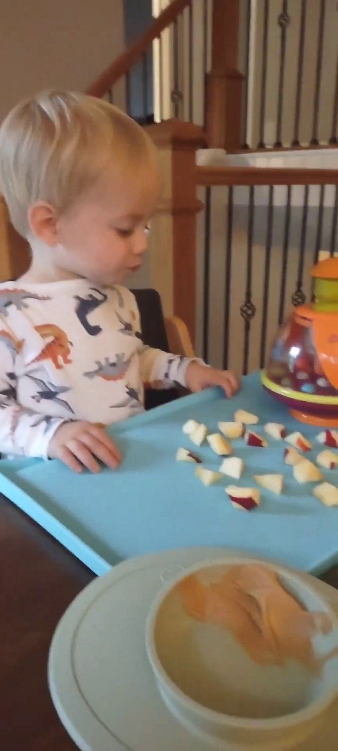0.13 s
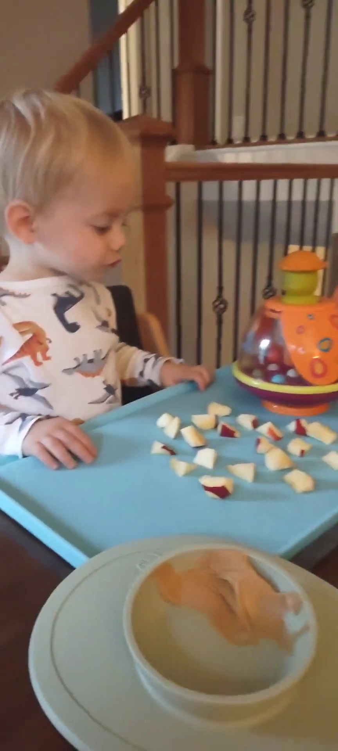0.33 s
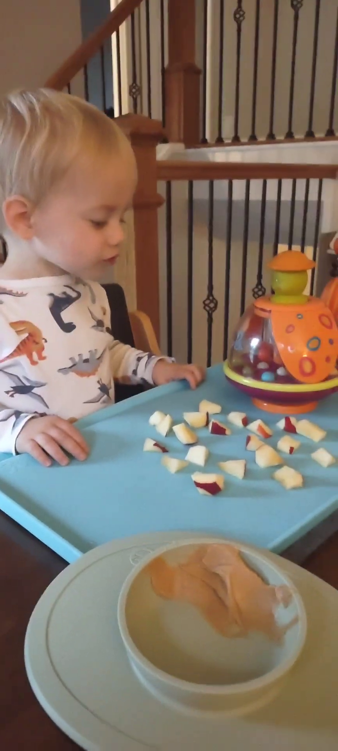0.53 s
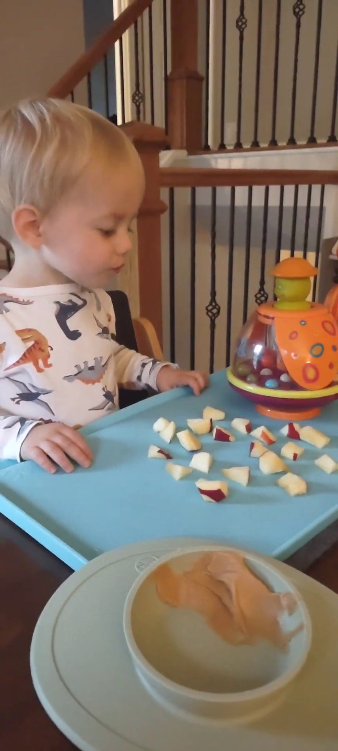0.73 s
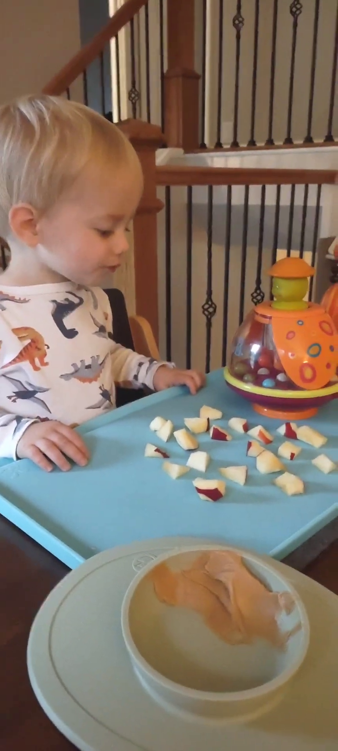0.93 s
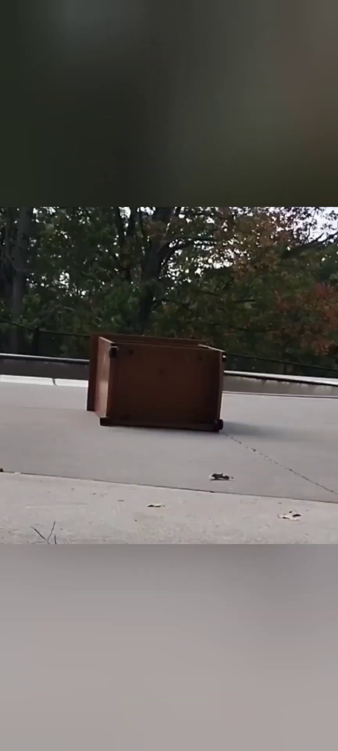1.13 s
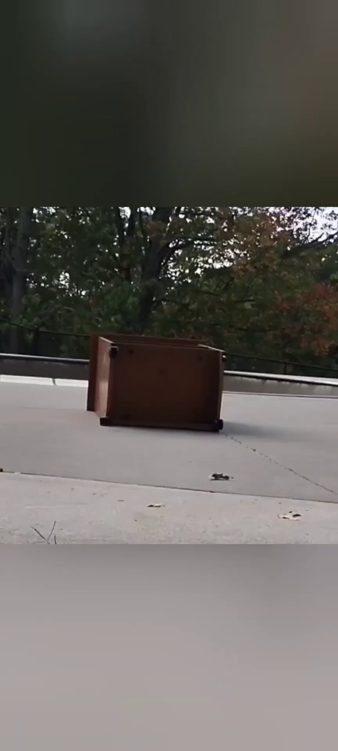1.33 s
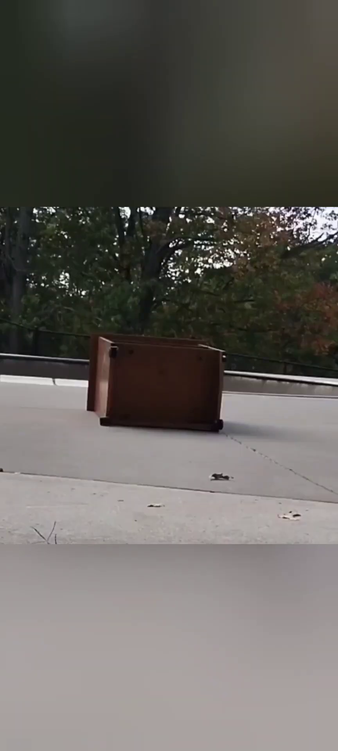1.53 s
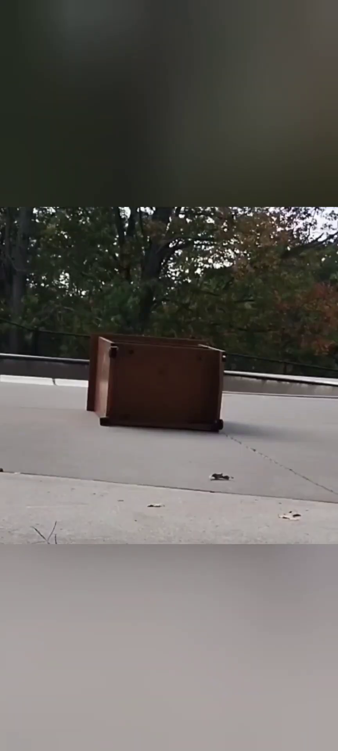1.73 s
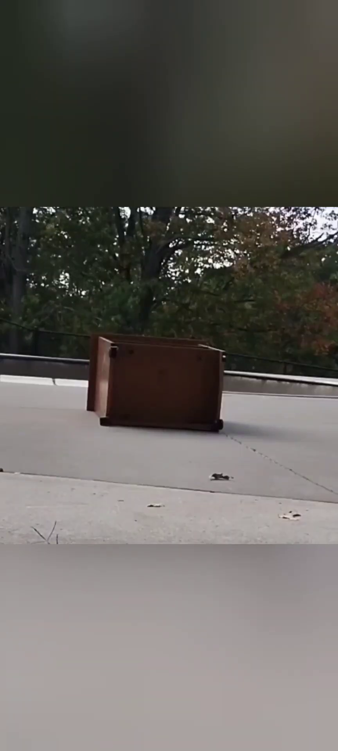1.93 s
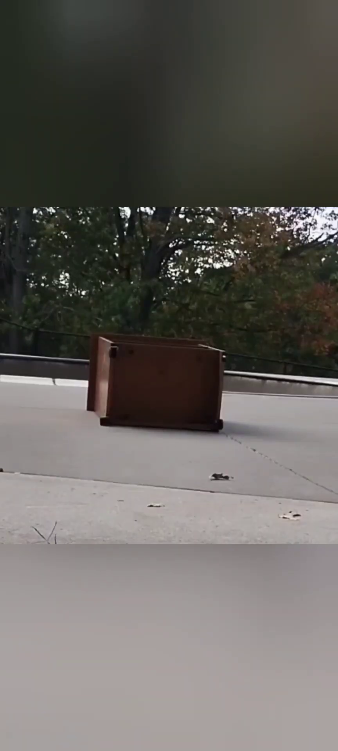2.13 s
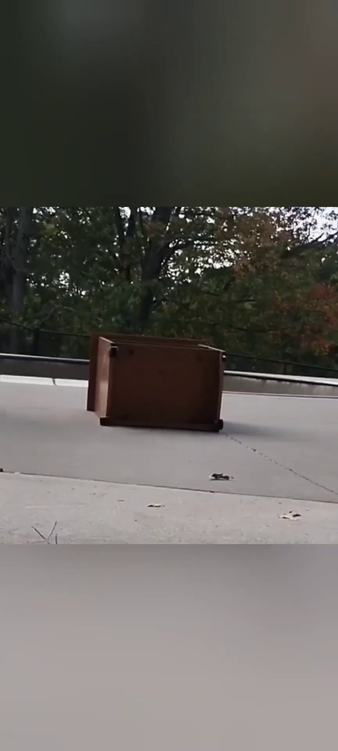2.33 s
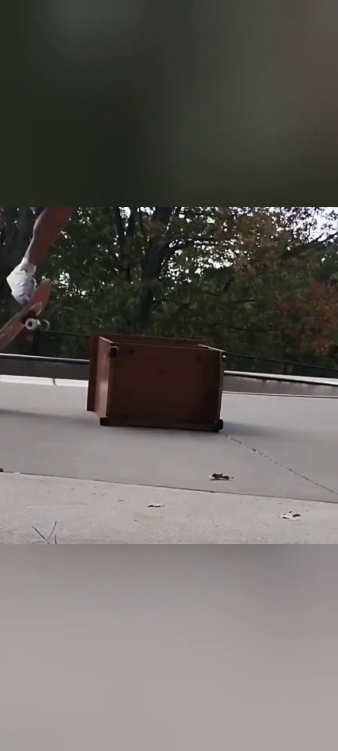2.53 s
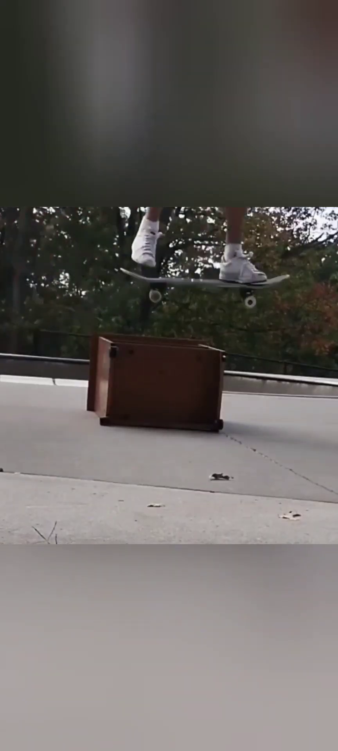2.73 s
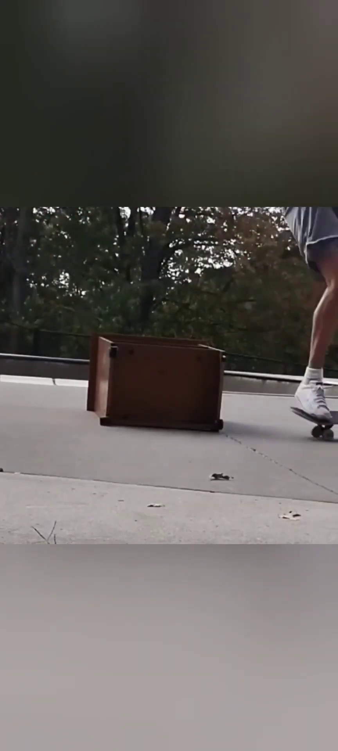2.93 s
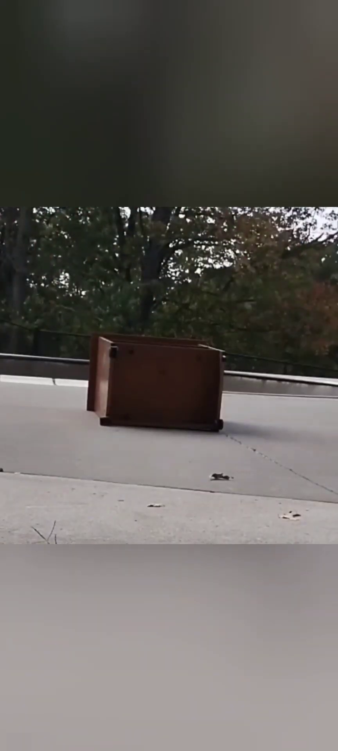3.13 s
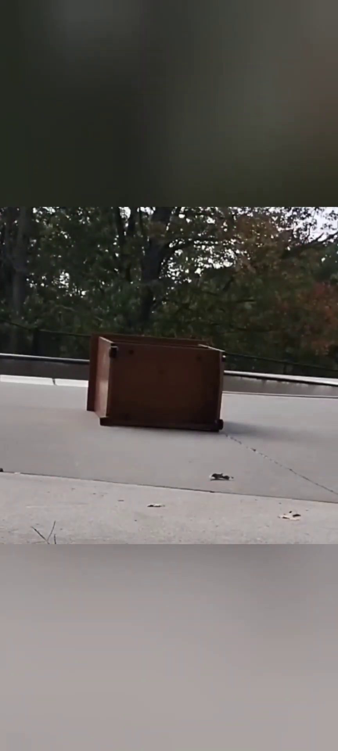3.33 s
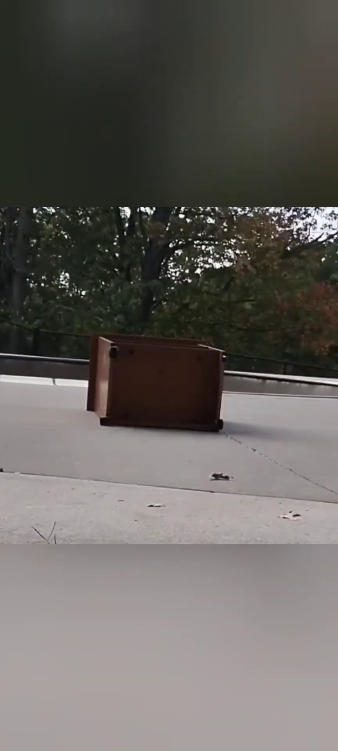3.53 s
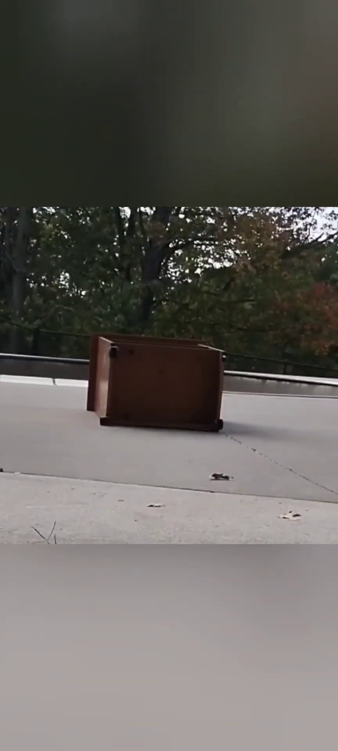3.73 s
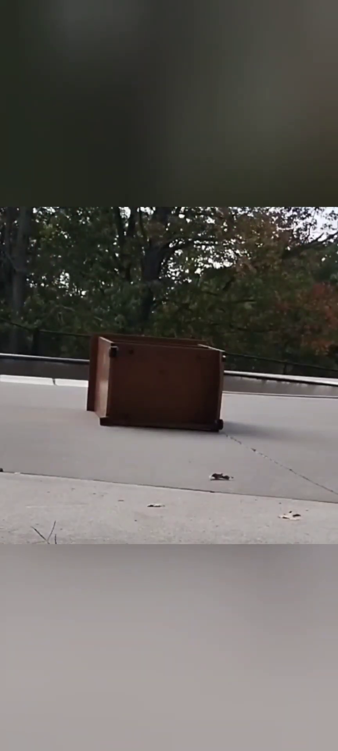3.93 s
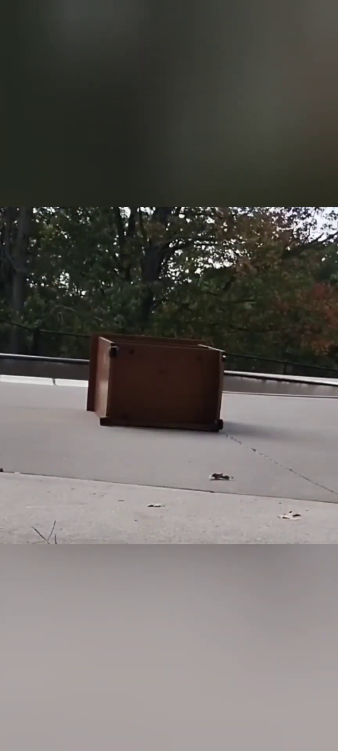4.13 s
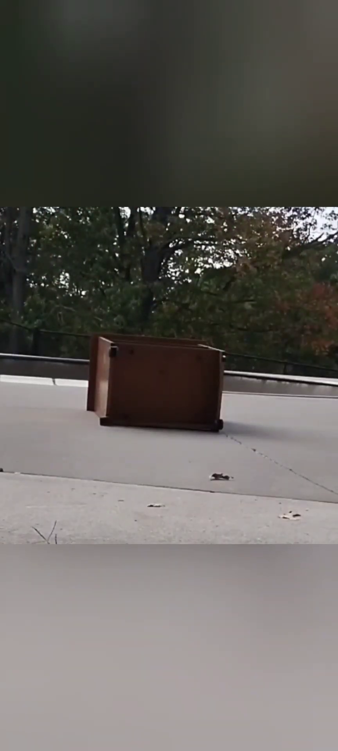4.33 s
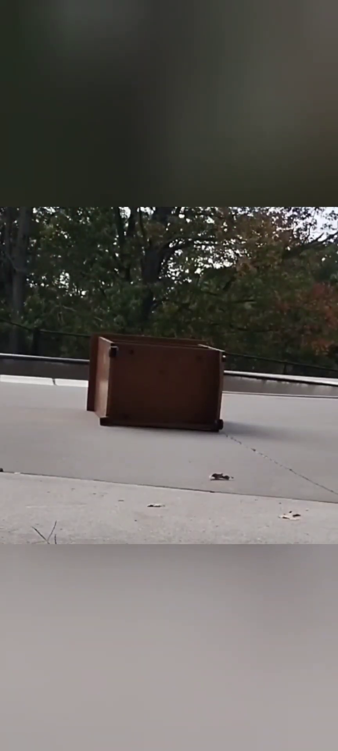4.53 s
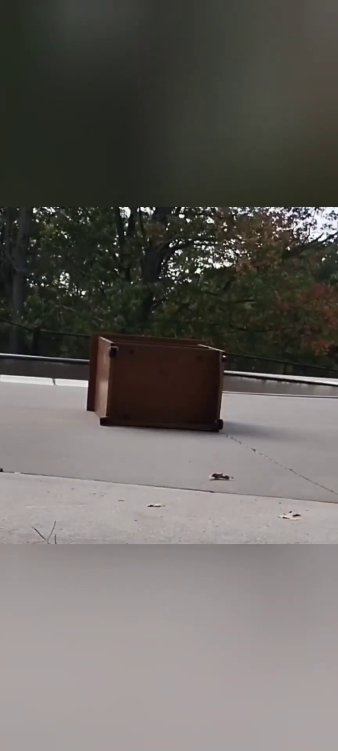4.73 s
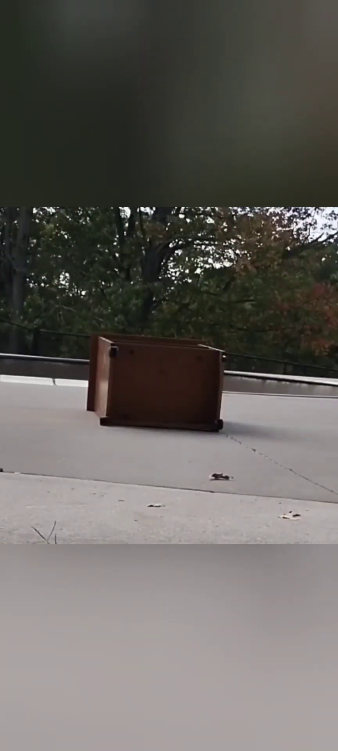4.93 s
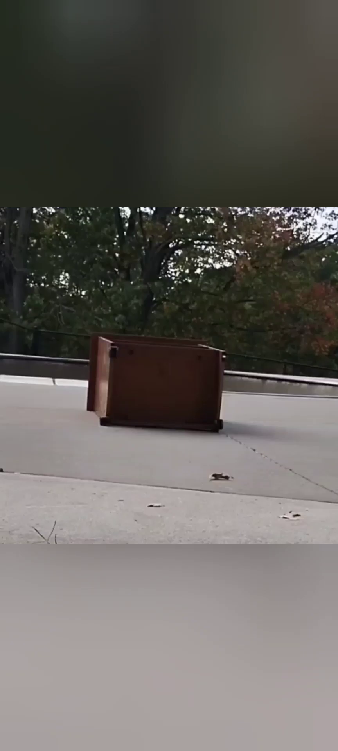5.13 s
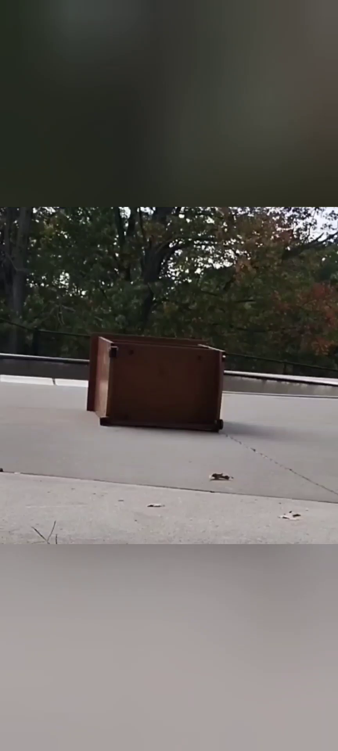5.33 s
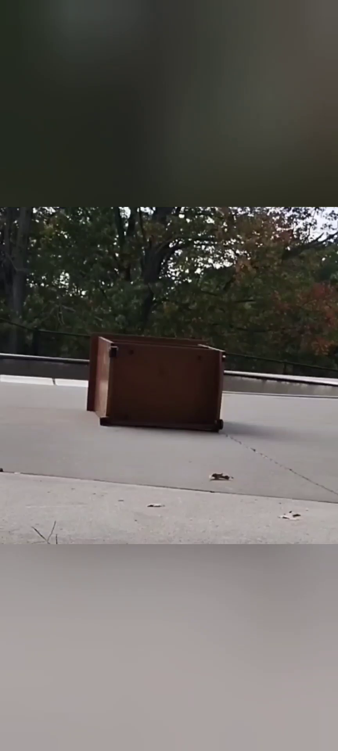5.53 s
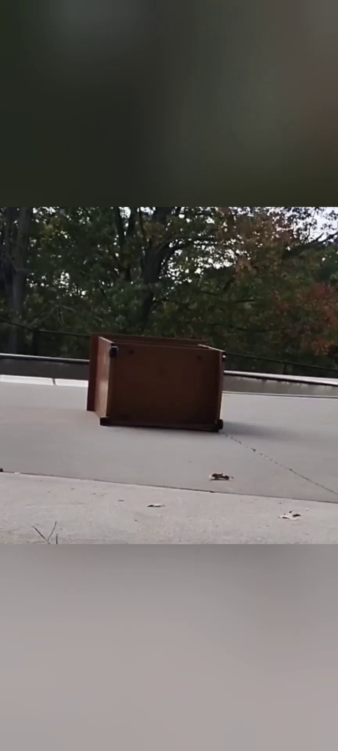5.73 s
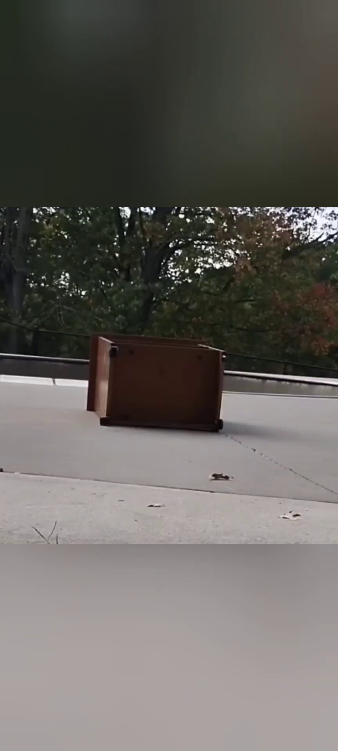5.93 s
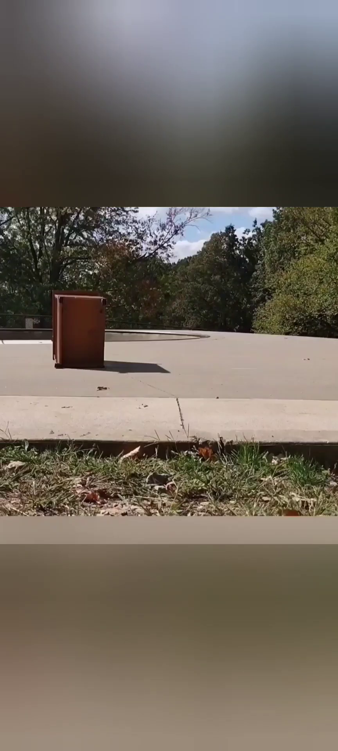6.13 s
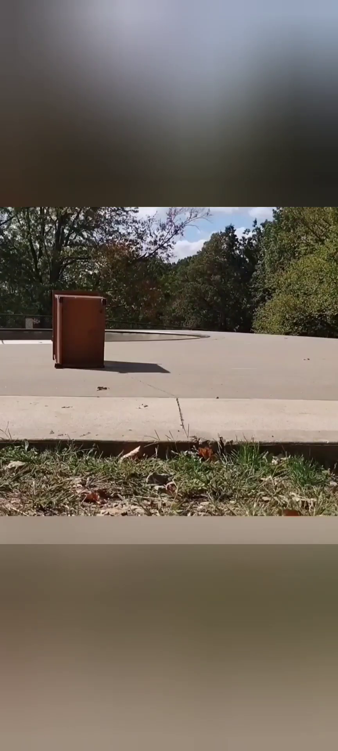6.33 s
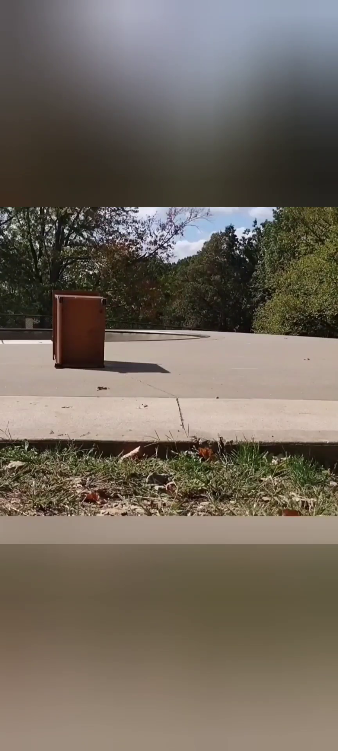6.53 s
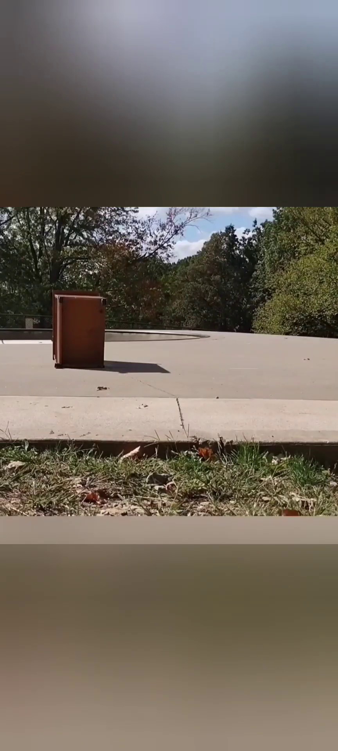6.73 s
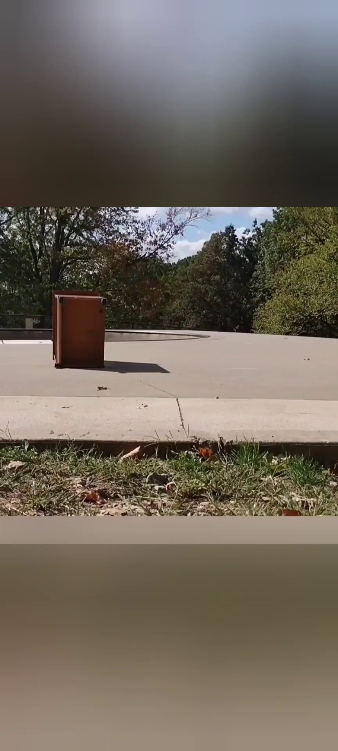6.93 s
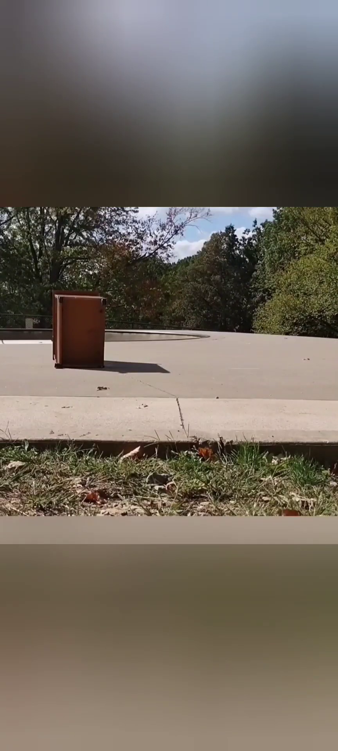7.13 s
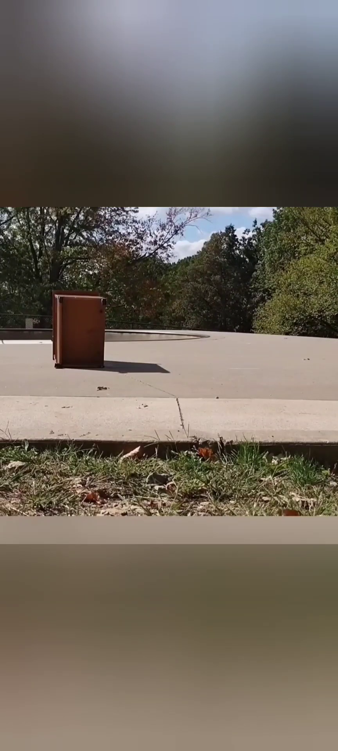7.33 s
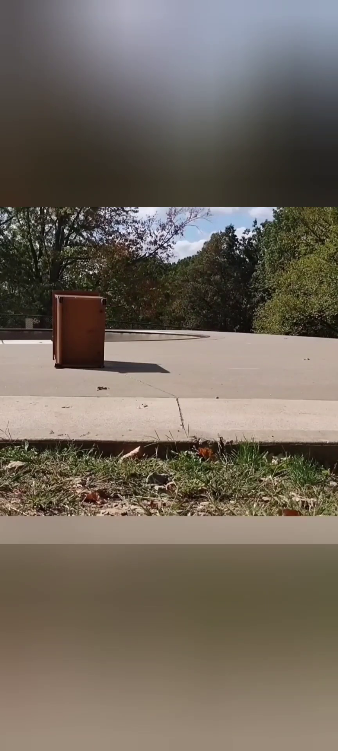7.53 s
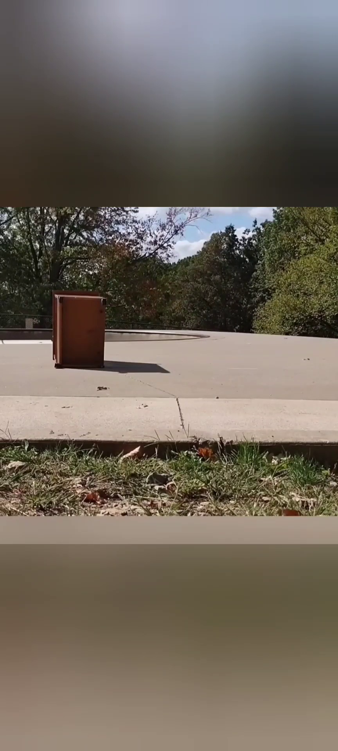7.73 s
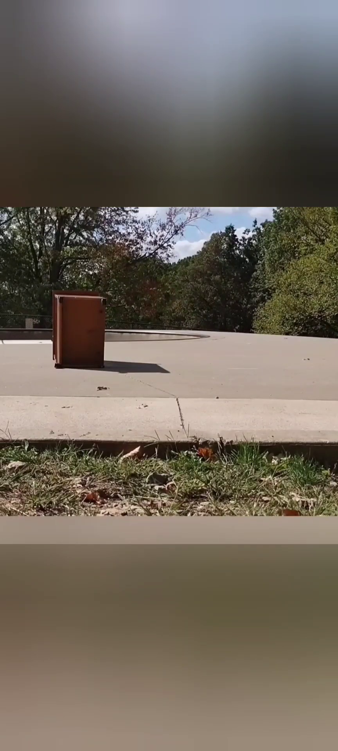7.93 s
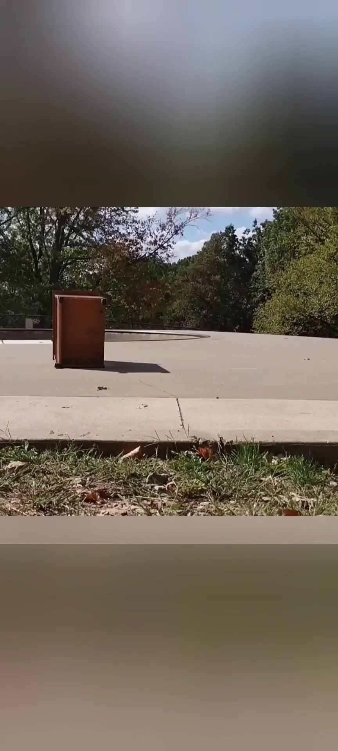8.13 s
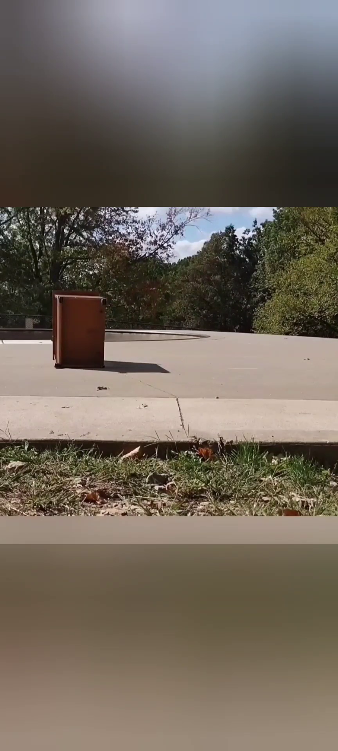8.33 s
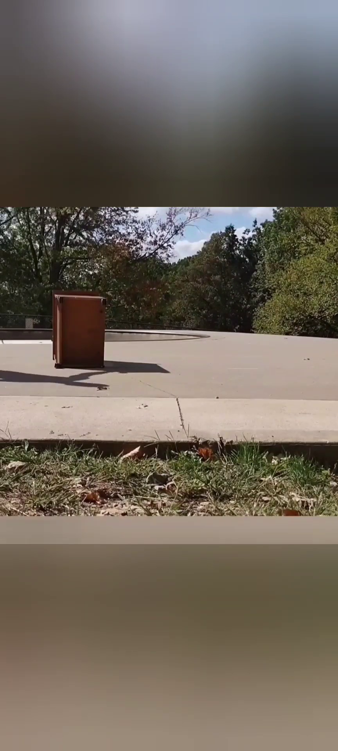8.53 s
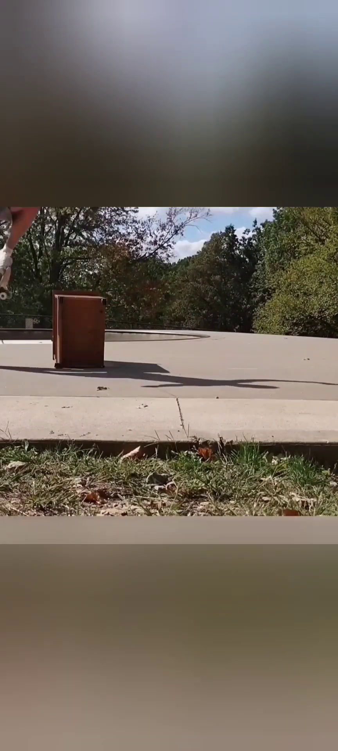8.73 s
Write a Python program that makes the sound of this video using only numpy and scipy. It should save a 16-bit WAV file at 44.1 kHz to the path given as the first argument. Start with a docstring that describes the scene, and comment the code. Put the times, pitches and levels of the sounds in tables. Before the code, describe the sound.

A very faint kitchen sizzle with tiny spits and a soft hum lasts about a second. It cuts to outdoor concrete: hard skateboard wheels roar closer, clacking over joints, the tail pops loudly, the board is briefly airborne, slams down and rolls away. After another cut a second run builds slowly to a duller pop at the end. A fixed microphone near the ground hears nearly everything on the right.

```python
"""Something sizzles faintly in a kitchen for a second; then a skateboard makes two runs on outdoor concrete.
Sizzle and rolling are trains of random impacts through colouring filters; ringing parts are resonances.
Hard wheels roar on the slab and clack over its joints; each run has a tail pop, and the first board slams down.
Each blow excites the deck's decaying modes. Trees answer with diffuse noise and a low drone wavers far off.
Nearly everything is in the right channel. Source levels are stated before a common doubling (+6 dB)."""
import sys
import numpy as np
from scipy import signal
from scipy.fft import rfft, irfft, next_fast_len
from scipy.io import wavfile
from scipy.ndimage import uniform_filter1d, map_coordinates

SR = 44100
rng = np.random.default_rng(int(sys.argv[2]) if len(sys.argv) > 2 else 0)


def master_out(mix):
    """Clip the mix to full scale and print it as 16-bit PCM to the path in sys.argv[1]."""
    frames = np.transpose(np.atleast_2d(mix))
    ceiling = np.clip(frames, -1, 1)
    pcm = np.round(ceiling * 32767).astype(np.int16)
    wavfile.write(sys.argv[1], SR, pcm)


N = 392049

# limits of the three stretches: (kitchen end [s], first run start [s], first run end [s], second run start [s])
STRETCHES = (1.139, 1.19, 6.135, 6.145)
# tail pop, landing and second tail pop: (time [s], peak level [dB], clack re knock [dB], crack re knock [dB],
# tail weight [0-1], contact time [s], low-pass corner [Hz], echo level [dB], echo treble boost [dB])
SLAMS = [(2.615, -7.5, -1.5, -23.5, 0.89, 0.0049, 8000, -35.5, 3.5),
         (3.03, -6.5, -2.5, -25.5, 0.02, 0.0077, 14040, -45.5, 12),
         (8.7795, -11.5, -6, -20, 0.92, 0.0046, 4500, -40.5, 8)]


def amp(db):
    """Level to amplitude ratio: 20 dB is a factor of ten."""
    return 10 ** (np.asarray(db) / 20)


def unit(x):
    """Normalization to an rms of 1."""
    return x / np.sqrt(np.mean(x ** 2) + 1e-20)


def steady(x, size):
    """Short-term normalization: x held at rms 1 over every size samples."""
    return x / np.sqrt(np.abs(uniform_filter1d(x ** 2, size=size)) + 1e-12)


def along(points, hz):
    """Linear interpolation of (frequency [Hz], value) points on a log-frequency axis."""
    f, v = np.transpose(points)
    return np.interp(np.log(hz + 1), np.log(f + 1), v)


def hump(hz, centre, octaves):
    """A Gaussian bell of height 1 on the log-frequency axis."""
    return np.exp(-.5 * (np.log2((hz + 1) / centre) / octaves) ** 2)


def curves(rows):
    """Linear interpolation in time: one value per sample for each column after the time."""
    s, *cols = np.transpose(rows)
    return [np.interp(np.arange(N) / SR, s, c) for c in cols]


def wobble(rate, size):
    """A smooth random curve: a spline through rate normal deviates a second."""
    knots = rng.standard_normal(int(size * rate / SR) + 4)
    return map_coordinates(knots, [np.arange(size) * rate / SR])


def between(start, end):
    """A gate: 1 from start to end [s], 0 outside, with edges smoothed over 128 samples."""
    t = np.arange(N) / SR
    return uniform_filter1d(((t >= start) & (t < end)) * 1., size=128)


def add(track, s, sound):
    """Superposition: mix a sound in at s seconds."""
    part = track[round(s * SR):][:len(sound)]
    part += sound[:len(part)]


def filtered(x, response):
    """Linear filtering: the spectrum of x times a response of frequency."""
    n = x.shape[-1]
    m = next_fast_len(n + 8192)
    return irfft(rfft(x, m) * response(np.fft.rfftfreq(m, 1 / SR)), m)[..., :n]


def coloured(x, spectrum):
    """Spectral shaping by (frequency [Hz], gain [dB]) points, at rms 1."""
    return unit(filtered(x, lambda hz: amp(along(spectrum, hz))))


def swept(x, gain_db):
    """Time-varying filtering: each short-time spectrum times gain_db(Hz, s)."""
    hz, t, z = signal.stft(x, SR, nperseg=1024)
    return signal.istft(z * amp(gain_db(hz[:, None], t)), SR, nperseg=1024)[1][:len(x)]


def resonant(modes):
    """Noise through parallel resonators, each two equal band-passes in cascade, at rms 1."""
    def response(f):
        return sum(amp(db) * (1j * f * w / (c * c - f * f + 1j * f * w)) ** 2 for c, w, db in modes)
    return unit(filtered(rng.standard_normal(N), response))


def grains(rate, spread_db, size):
    """Shot noise: tiny impacts at random moments, rate a second, with log-normal sizes, at rms 1."""
    struck = rng.random(size) < rate / SR
    sign = np.sign(rng.standard_normal(size))
    return unit(struck * sign * amp(spread_db * rng.standard_normal(size)))


def kitchen():
    """Shot noise modulated into clumps, with decaying spits, a resonant appliance hum and two soft knocks."""
    # sizzle: (time [s], level [dB])
    sizzle_level = [(0, -53.5), (0.17, -57.5), (0.37, -54.5), (0.58, -60.5), (0.68, -56.5), (0.8, -64.5),
                    (0.88, -64.5), (0.99, -57), (1.13, -65)]
    # sizzle colour: (frequency [Hz], relative density [dB])
    frying_colour = [(40, -28), (100, -5), (260, -15), (480, -6), (660, -4), (960, -11.5), (1300, -2.5),
                     (1750, 0), (2100, -4), (2600, -1), (3700, -5.5), (4600, -0.5), (5500, -10),
                     (7700, -8.5), (9800, -26), (13000, -19), (15500, -27)]
    # the loudest spits: (time [s], peak level [dB])
    loud_spits = [(0.1116, -39), (0.1663, -36), (0.221, -45), (0.235, -39.5), (0.277, -42), (0.3768, -42),
                  (0.627, -41.5), (0.823, -45), (0.8975, -42.5), (0.9778, -42.5), (1.054, -38)]
    # spit colour: (frequency [Hz], relative density [dB])
    spit_colour = [(800, -9), (2000, -18.5), (4800, 3.5), (7500, -0.5), (10000, -14), (15000, -10.5)]
    # soft knocks: (time [s], peak level of the tone [dB], frequency [Hz])
    soft_knocks = [(0.118, -55.5, 106), (1.101, -74, 85)]
    end = STRETCHES[0]
    n = round(end * SR)
    room = amp(-79) * steady(resonant([(384.7, 12, 0)]), size=2000)  # the hum
    clumps = unit(amp(2.5 * wobble(170, size=n)))
    sizzle = clumps * coloured(grains(9000, 3.4, size=n), frying_colour)
    add(room, 0, amp(curves(sizzle_level)[0][:n]) * sizzle)

    t = np.arange(SR // 8) / SR
    small_spits = [(rng.uniform(0, end), rng.normal(-51, 1)) for _ in range(12)]
    decay = amp(-60 * t / 0.022) + amp(-26 - 60 * t / 0.13)  # fast, then slow
    for s, db in loud_spits + small_spits:
        spit = coloured(rng.standard_normal(len(t)), spit_colour) * decay
        add(room, s, amp(db) * spit / np.abs(spit).max())

    swell = t / 0.014
    thud_colour = [(60, 0), (500, -7), (1500, -15), (5000, -50)]
    for s, db, hz in soft_knocks:
        thud = amp(-57 - 60 * t / .05) * coloured(rng.standard_normal(len(t)), thud_colour)
        tone = swell * np.exp(1 - swell) * np.sin(2 * np.pi * hz * t)
        add(room, s, thud + amp(db) * tone)
    return room


def drone():
    """Narrow-band noise: two low resonances waver like a distant engine."""
    # drone: (time [s], level [dB])
    drone_level = [(1.3, -57), (1.7, -49.5), (2.19, -55), (2.38, -47.5), (3.07, -49), (3.2, -41),
                   (3.78, -51), (4.21, -49), (4.5, -56.5), (4.84, -50), (5.14, -60), (5.46, -73),
                   (5.62, -52.5), (5.95, -54), (6.06, -62), (7.7, -66), (8.14, -57), (8.69, -73)]
    # drone resonances: (centre [Hz], width of each cascaded band-pass [Hz], relative gain [dB])
    drone_modes = [(71.5, 5.4, -1), (95, 6.2, -10.5)]
    return amp(curves(drone_level)[0]) * steady(resonant(drone_modes), size=4000)


def trees(swell_s):
    """Diffuse scattering: the tree line's wash swells, then decays at a rate set by frequency."""
    # reverberation: (frequency [Hz], t60 [s])
    tree_t60 = [(100, 0.36), (500, 0.25), (2500, 0.91), (6000, 0.97), (14000, .3)]
    # echo colour ahead of the decay: (frequency [Hz], relative density [dB])
    echo_colour = [(100, -5), (300, 11.5), (600, 6), (1300, -1.5), (2800, -4), (4500, -23.5), (7000, -29),
                   (11000, -40), (15000, -51)]
    hz, t, z = signal.stft(coloured(rng.standard_normal(SR), echo_colour), SR, nperseg=256)
    decay = amp(-60 * t / along(tree_t60, hz)[:, None])
    tail = signal.istft(z * decay, SR, nperseg=256)[1]
    return tail * (1 - np.exp(-np.arange(len(tail)) / SR / swell_s))


def board_ringing():
    """Forced resonance: on the second run trucks ring on coarse slab, wheels whirr and the flexing deck booms."""
    # trucks on a coarse stretch, spinning wheels, flexing deck: (time [s], level [dB])
    truck_level = [(6.15, -68), (6.35, -58.5), (6.55, -52), (6.75, -49.5), (6.9, -54), (7.1, -76),
                   (7.3, -100)]
    whirr_level = [(7.5, -87), (7.75, -64), (8.1, -64.5), (8.3, -67), (8.78, -57.5), (8.82, -86)]
    boom_level = [(6.2, -60), (6.82, -50), (7.2, -57.5), (8.3, -57.5), (8.88, -58)]
    # their resonances: (centre [Hz], width of each cascaded band-pass [Hz], relative gain [dB])
    truck_modes = [(856, 130, -1.5), (1025, 98, -0.52)]
    whirr_modes = [(1985, 200, 1), (4460, 1350, -18.5), (11400, 1200, -31)]
    boom_modes = [(140, 32, 0), (217.5, 30, 0)]
    ringing_trucks = amp(curves(truck_level)[0]) * resonant(truck_modes)
    whirr = amp(curves(whirr_level)[0]) * resonant(whirr_modes)
    boom = amp(curves(boom_level)[0]) * resonant(boom_modes)
    return ringing_trucks + whirr + boom


def rolling(start, end, roar_curve, near_curve, grit_colour, hiss_colour, octaves, hiss_db, hiss_follows,
            rumble_db, rumble_fade_db_per_s, comb_db, comb_hz, comb_rise_hz_per_s):
    """Roughness excitation: wheels hammer the concrete's grain; the roar's hump glides and the rumble fades."""
    # colours of roar (ahead of its hump) and rumble: (frequency [Hz], relative density [dB])
    roar_colour = [(130, -18.5), (240, 0), (340, 0), (480, -4.5), (700, -0.5), (850, -7.5), (1050, -26),
                   (1600, -58.5)]
    rumble_colour = [(20, -25), (45, -9), (70, 3.5), (115, 6.5), (160, 1.5), (210, 2.5), (270, -3.5),
                     (450, -53)]
    stretch = slice(round(start * SR), round(end * SR))
    roar_db, centre, grit_db = [c[stretch] for c in curves(roar_curve) + curves(near_curve)]
    n = len(roar_db)
    t = np.arange(n) / SR

    # the hump sharpens as the roar rises over the grit
    height_db = np.maximum(5, 4.5 + 0.88 * (roar_db - grit_db))

    def gliding_hump(hz, s):
        return np.interp(s, t, height_db) * hump(hz, np.interp(s, t, centre), octaves)

    def comb(hz, s):
        """Interference: a slab reflection ripples the spectrum evenly; the ripples slide as the board travels."""
        return -comb_db * np.cos(2 * np.pi * hz / (comb_hz + comb_rise_hz_per_s * s))

    body = swept(coloured(grains(5000, 2.54, size=n), roar_colour), gliding_hump)
    roar = amp(roar_db) * steady(body, size=3000)
    grit = amp(grit_db) * coloured(grains(6000, 1.95, size=n), grit_colour)
    fizz = swept(coloured(grains(14000, 4.2, size=n), hiss_colour), comb)
    hiss = amp(hiss_db + hiss_follows * (grit_db - grit_db.mean())) * fizz
    rumble = steady(coloured(rng.standard_normal(n), rumble_colour), size=6000)
    rumble = amp(rumble_db - rumble_fade_db_per_s * t) * rumble
    bumpy = amp(0.75 * wobble(55, size=n))  # uneven patches jolt all four wheels
    track = np.zeros(N)
    add(track, start, rumble + bumpy * (roar + grit + hiss))
    return track


def blow(clack_db, crack_db, tail_weight, contact, clatter_db, clatter_t60, colour):
    """Impact excitation, peak 1: deck modes and clatter sustain during contact [s], then decay freely."""
    # deck modes: (frequency [Hz], t60 [s], tail term [dB], wheel term [dB]); the terms are weighted below
    deck_modes = [(252, 0.13, -13.5, -19.5), (357.6, 0.074, -27.5, -2), (510, 0.062, 10.5, -19),
                  (624.7, 0.044, -15, -2.5), (748, 0.04, -4, -6), (941, 0.028, -32, 1),
                  (1191, 0.06, -30.5, -6), (1347, 0.063, -12.5, -9.5), (1671, 0.041, -12, -10.5),
                  (1767, 0.015, -5, -9), (1892, 0.03, -1.5, -16), (2342, 0.035, -17.5, -9.5),
                  (2667, 0.026, -19, -11), (2804, 0.021, 2, -26), (3570, 0.033, -29, -18),
                  (3890, .04, -14.5, -23.5)]
    # clatter colour: (frequency [Hz], relative density [dB])
    clatter_colour = [(60, -45), (200, -3.5), (450, 6), (800, -2.5), (1050, 1.5), (1800, -7), (2700, -9),
                      (3300, -18.5), (3900, -21), (6000, -25.5), (10000, -31), (15000, -50)]
    t = np.arange(SR // 6) / SR
    free = np.maximum(t - contact, 0)
    tail_weight = np.clip(tail_weight, 0, 1)
    ring = np.zeros(len(t))
    for hz, t60, tail_db, wheel_db in deck_modes:
        mode_db = tail_weight * tail_db + (2.0 - tail_weight) * wheel_db
        tone = np.sin(2 * np.pi * (hz * t + rng.random()))
        ring += colour(hz) * amp(mode_db - 60 * free / t60) * tone
    clatter = filtered(coloured(rng.standard_normal(len(t)), clatter_colour), colour)
    clatter = clatter * amp(-60 * free / clatter_t60)
    onset = 1 - np.exp(-t / 0.00069)
    hit = (unit(ring) + amp(clatter_db) * unit(clatter)) * onset

    def band(edge, kind):
        return unit(signal.sosfilt(signal.butter(5, edge, kind, fs=SR, output="sos"), hit))

    # rebalance three bands of the hit
    knock = band(930, "low")
    clack = band([1080, 3800], "band")
    crack = band(3700, "high")
    hit = knock + amp(clack_db) * clack + amp(crack_db) * crack
    return hit / np.abs(hit).max()


def blows():
    """Impulsive contact: the tail pops, the board lands, and the wheels cross joints and pits."""
    # joints and pits: (time [s], peak level [dB], clack re knock [dB], centre of the knock's boost [Hz])
    joints = [(1.655, -24.5, -20, 486), (1.761, -25.5, -26, 523), (2.32, -27.5, -28, 585),
              (2.421, -22.5, -21, 572), (2.862, -22, -5.5, 320), (3.071, -33, -20, 641),
              (3.979, -20.5, -9.5, 434), (4.041, -26.5, -7, 405), (4.461, -24.5, -29, 367),
              (5.28, -49.5, -25, 694), (5.563, -37, -13.5, 474), (6.888, -26.5, -21, 653),
              (6.989, -31, -25, 467), (7.903, -32.5, -33, 373), (8.123, -33, -31, 549),
              (8.479, -33, -27, 630), (8.642, -29, -26, 516)]
    track = np.zeros(N)
    for s, db, clack_db, crack_db, tail_weight, contact, dull_hz, echo_db, bright_db in SLAMS:
        dull = lambda hz: 1 / np.sqrt(1 + (hz / dull_hz) ** 4)  # second-order low-pass
        hit = blow(clack_db, crack_db, tail_weight, contact, clatter_db=-6.5, clatter_t60=0.052, colour=dull)
        add(track, s, amp(db) * hit)
        treble = lambda hz: amp(bright_db * hump(hz, 4700, octaves=0.72))
        add(track, s, amp(echo_db) * filtered(trees(swell_s=0.0095), treble))
    for s, db, clack_db, knock_hz in joints:
        wheel = lambda hz: amp(14.5 * hump(hz, knock_hz, octaves=0.12))
        crack_db = -26 + 0.7 * clack_db  # a harder clack brings more crack
        hit = blow(clack_db, crack_db, tail_weight=0.53, contact=0.0054,
                   clatter_db=3.0, clatter_t60=0.051, colour=wheel)
        add(track, s, amp(db) * hit)
    return track


def scene():
    """Superposition of all sources on the right; the left gets leakage and diffuse scatter."""
    # roar on the approach, the roll-away and the second run: (time [s], level [dB], hump centre [Hz])
    roar_approach = [(1.35, -43.5, 425), (1.58, -41.5, 400), (1.89, -43.5, 546), (2.2, -42, 665),
                     (2.41, -34, 513), (2.5, -38, 496), (2.72, -58.5, 550), (2.87, -45.5, 496),
                     (2.97, -54.5, 640)]
    roar_away = [(3.07, -46, 598), (3.22, -40, 523), (3.4, -44.5, 424), (3.63, -43, 406),
                 (3.96, -51.5, 480), (4.13, -45, 454), (4.45, -41.5, 410), (4.65, -49, 446),
                 (4.86, -47.5, 433), (5.28, -68, 460)]
    roar_again = [(6.25, -44.5, 470), (6.55, -45.5, 485), (6.78, -44.5, 577), (7.08, -52.5, 493),
                  (7.43, -45.5, 457), (7.7, -49, 432), (7.92, -44.5, 454), (8.03, -45.5, 540),
                  (8.27, -38, 627), (8.42, -40.5, 590), (8.6, -34, 510), (8.74, -50, 484),
                  (8.88, -55.5, 524)]
    # grit, which grows as the board comes near: (time [s], level [dB])
    near_approach = [(1.62, -53.5), (2.17, -49.5), (2.61, -45), (2.73, -57), (2.87, -46.5), (3.0, -54)]
    near_away = [(3.07, -44), (3.19, -39.5), (3.38, -46.5), (3.64, -49), (3.82, -48), (4.12, -52.5),
                 (4.5, -53), (4.86, -58), (5.15, -66), (6.1, -66.5)]
    near_again = [(6.2, -58.5), (6.6, -56.5), (6.92, -54), (7.14, -58.5), (7.85, -58.5), (8.05, -55),
                  (8.5, -53), (8.67, -48), (8.88, -52.5)]
    # colours of grit and hiss (ahead of its comb): (frequency [Hz], relative density [dB])
    grit_approach = [(560, -18), (900, 1), (1020, -7), (1140, 1), (1240, -6), (1420, 0), (1900, -2.5),
                     (2080, -3.5), (2260, -9), (2640, -7.5), (3200, -15), (3750, -30), (5000, -56)]
    grit_away = [(470, -25), (800, 0.5), (1020, -6), (1140, -1), (1420, -5.5), (1760, -5), (2030, -10),
                 (2900, -14.5), (3350, -22), (4500, -49), (5850, -65), (9900, -120)]
    grit_again = [(530, -16), (900, 0), (1180, 1), (1380, -5), (1550, -4), (1850, -9.5), (2040, -8),
                  (2230, -15), (2700, -15), (3300, -23), (3900, -30), (4500, -43), (6000, -65)]
    hiss_approach = [(2500, -12), (3600, 3.5), (4700, -4.5), (6400, -3.5), (7300, -10.5), (8200, -15.5),
                     (9200, -12.5), (9900, -16), (10700, -10), (11800, -27.5), (16000, -45)]
    hiss_away = [(2500, -14), (3800, 3), (5330, -8), (6050, -4.5), (6700, -9.5), (7500, -15.5),
                 (8650, -13.5), (9740, -17), (10600, -17.5), (11500, -30.5), (16000, -48)]
    hiss_again = [(2500, -10), (3900, 3.5), (4400, -5), (5400, -8), (6100, -6), (7000, -7.5), (7700, -18),
                  (9400, -15.5), (10400, -21), (11400, -18.5), (12500, -39), (16000, -53)]
    # direct and scattered paths into the left channel: (frequency [Hz], gain [dB])
    leak_gain = [(60, -44), (400, -40.5), (1500, -43), (8000, -53.5)]
    scatter_gain = [(60, -36), (120, -22), (400, -35.5), (1000, -31), (2800, -25), (4000, -21.5),
                    (8000, -17)]

    indoors_end, first, first_end, second = STRETCHES
    landing = SLAMS[1][0]
    approach = rolling(first, landing, roar_approach, near_approach, grit_approach, hiss_approach, octaves=0.31,
                       hiss_db=-71.5, hiss_follows=0.15, rumble_db=-51, rumble_fade_db_per_s=5.5,
                       comb_db=2.5, comb_hz=1656, comb_rise_hz_per_s=400)
    away = rolling(landing, first_end, roar_away, near_away, grit_away, hiss_away, octaves=0.28,
                   hiss_db=-75.5, hiss_follows=0.78, rumble_db=-49.0, rumble_fade_db_per_s=4.5,
                   comb_db=1.0, comb_hz=2500, comb_rise_hz_per_s=-90)
    again = rolling(second, N / SR, roar_again, near_again, grit_again, hiss_again, octaves=0.32,
                    hiss_db=-72.5, hiss_follows=0.46, rumble_db=-52.5, rumble_fade_db_per_s=3.5,
                    comb_db=-0.5, comb_hz=2650, comb_rise_hz_per_s=60)
    outdoors = approach + away + again
    outdoors += board_ringing() * between(second, np.inf) + drone() * between(first, np.inf)
    right = 2 * (outdoors + blows() + kitchen() * between(0, indoors_end))

    # the scattered path takes the rolling, ringing and drone but not the blows
    t = np.arange(SR // 4) / SR
    scatter = rng.standard_normal(len(t)) * amp(-60 * t / 0.5)
    diffuse = signal.fftconvolve(2 * outdoors, scatter / np.linalg.norm(scatter))[:N]
    leaked = filtered(right, lambda hz: amp(along(leak_gain, hz)))
    scattered = filtered(diffuse, lambda hz: amp(along(scatter_gain, hz)))
    return np.array([leaked + scattered, right])


def record(dry):
    """Additive noise and band limiting: faint input noise, silent between kitchen and first run."""
    # input noise colour: (frequency [Hz], relative density [dB])
    noise_colour = [(20, -15), (100, -8), (200, -8.5), (1000, -17.5), (5000, -22), (15000, -25)]
    noise = amp([[-79.5], [-84]]) * coloured(rng.standard_normal((2, N)), noise_colour)  # left, right
    noise = noise * (1 - between(STRETCHES[0], STRETCHES[1]))
    return filtered(dry + noise, lambda hz: hz < 15850)


dry = scene()
out = record(dry)
master_out(out)
```